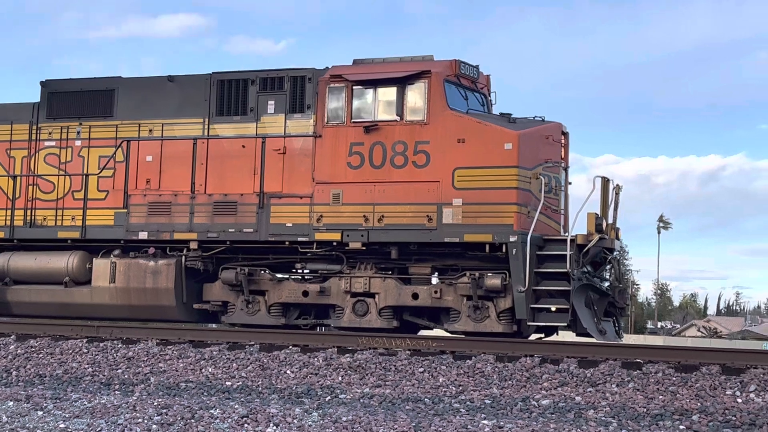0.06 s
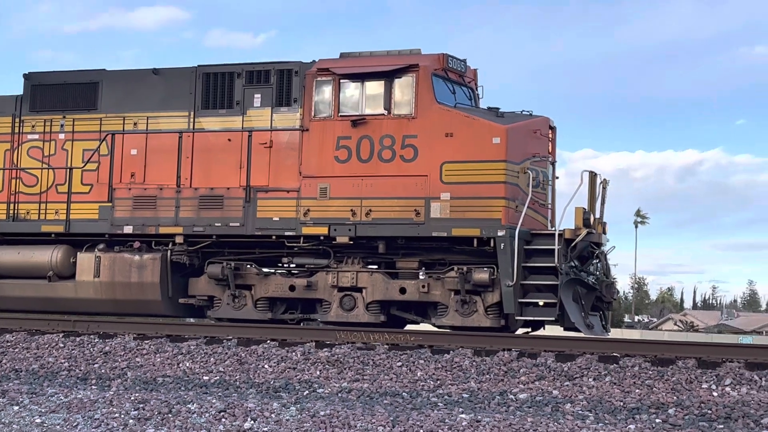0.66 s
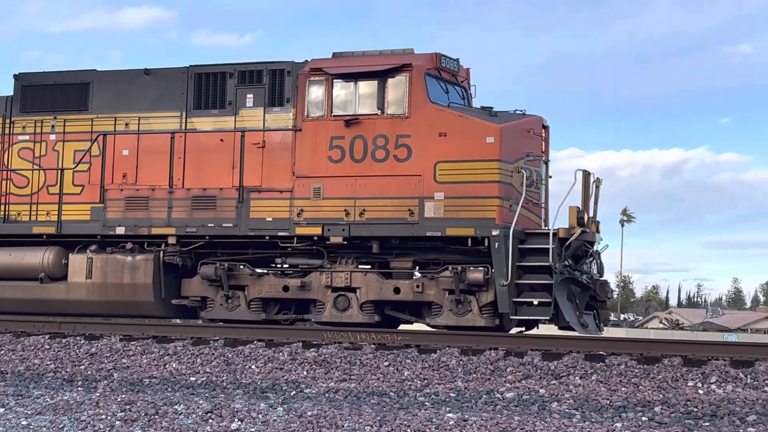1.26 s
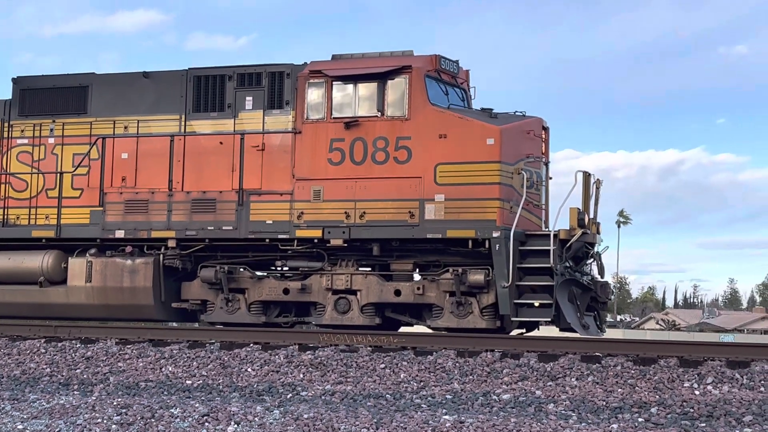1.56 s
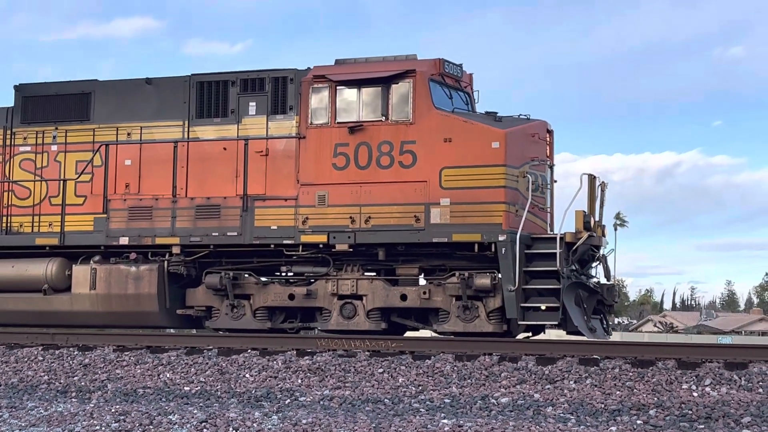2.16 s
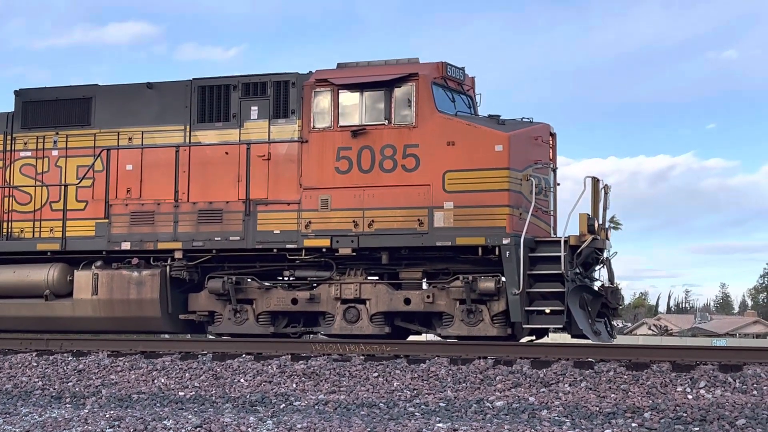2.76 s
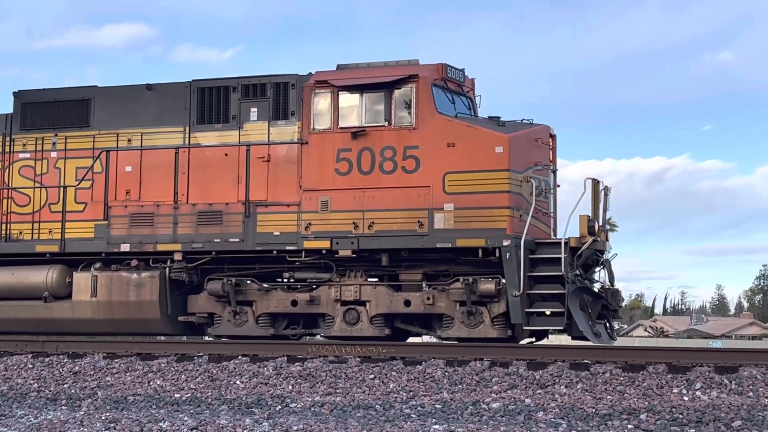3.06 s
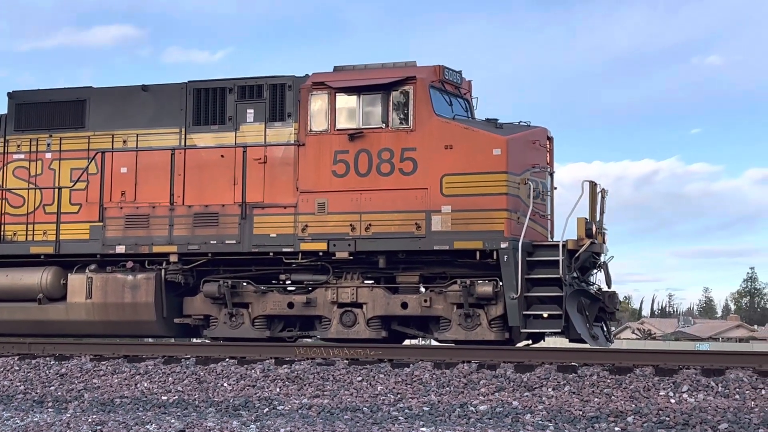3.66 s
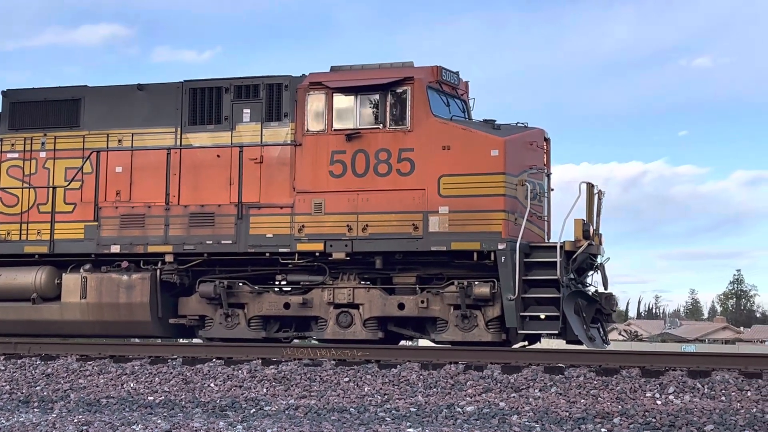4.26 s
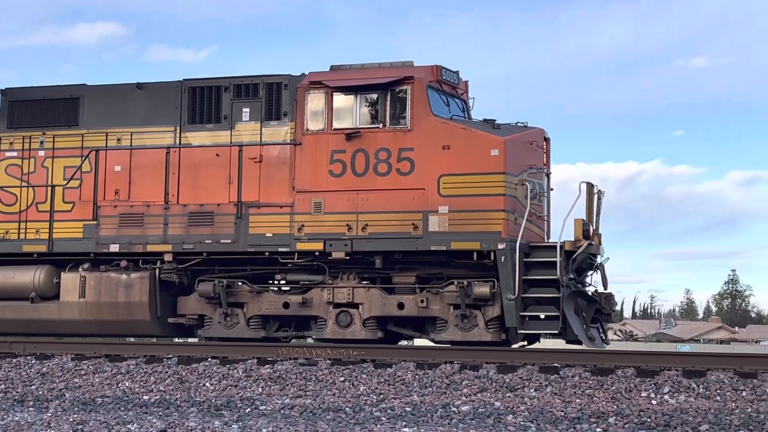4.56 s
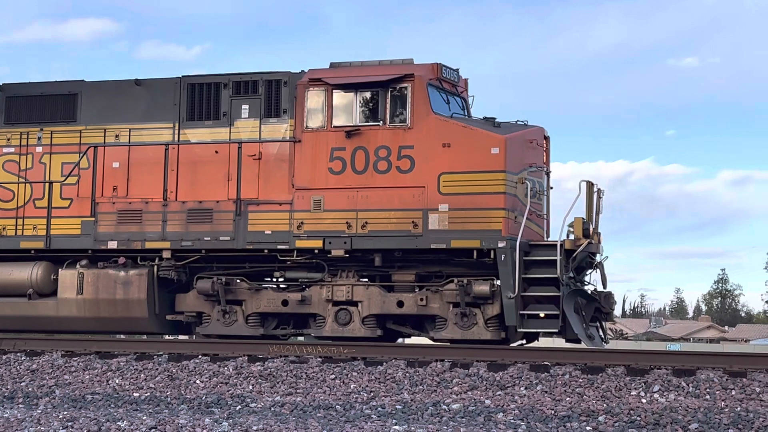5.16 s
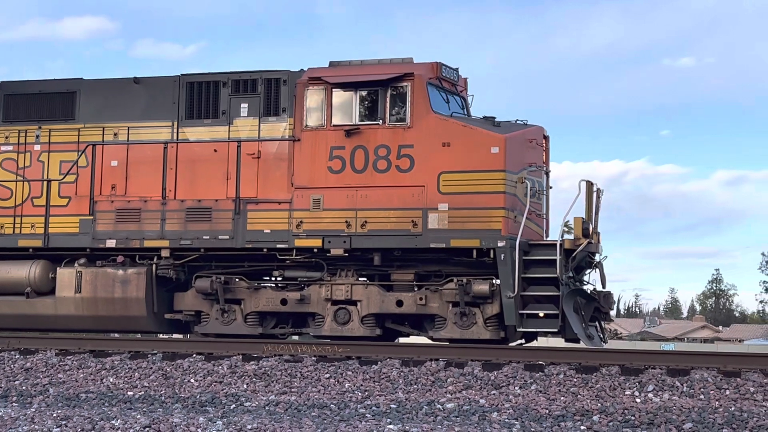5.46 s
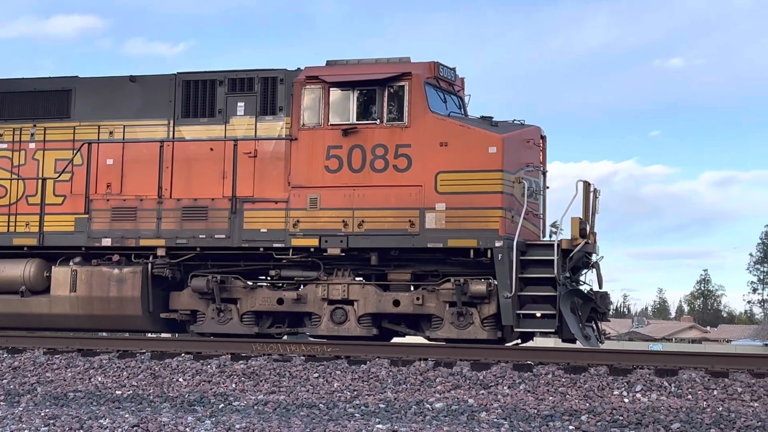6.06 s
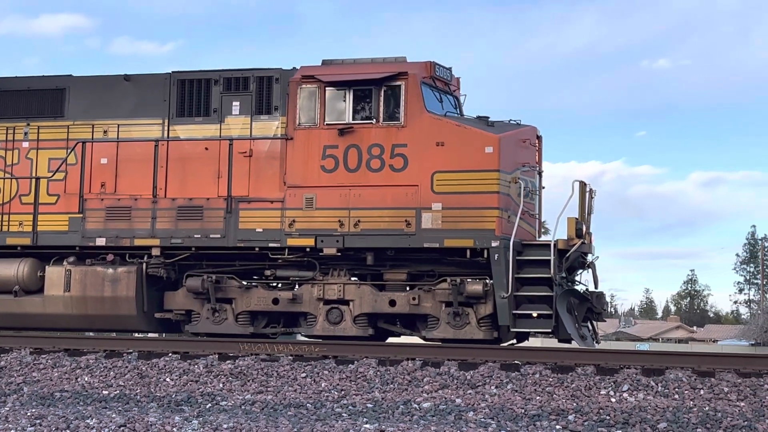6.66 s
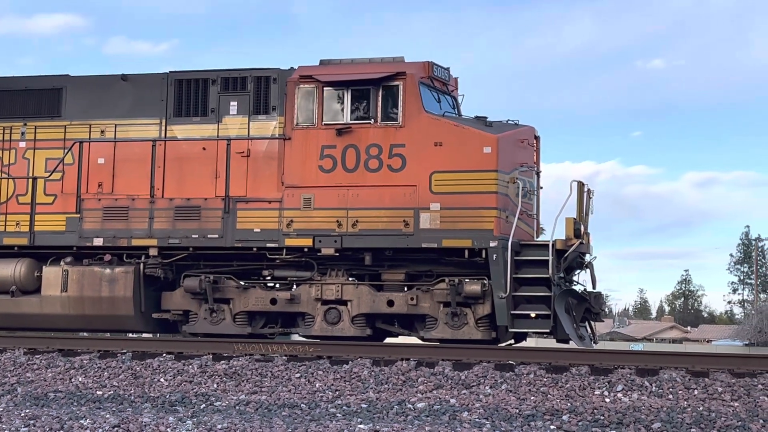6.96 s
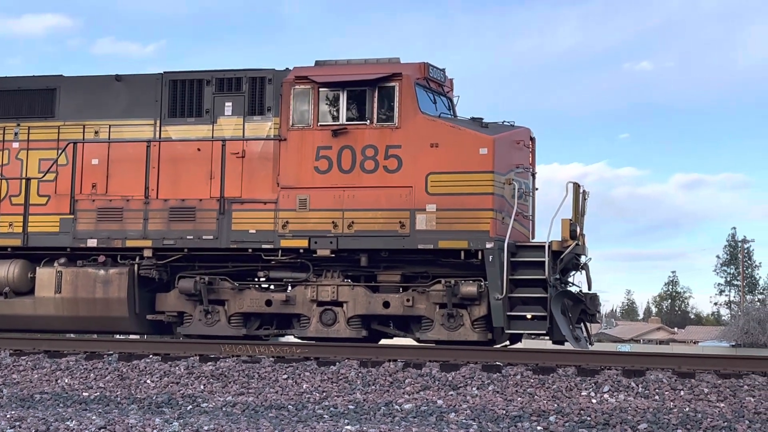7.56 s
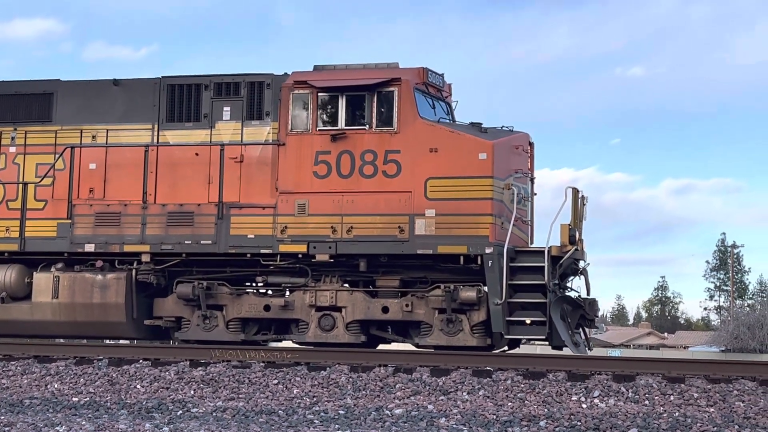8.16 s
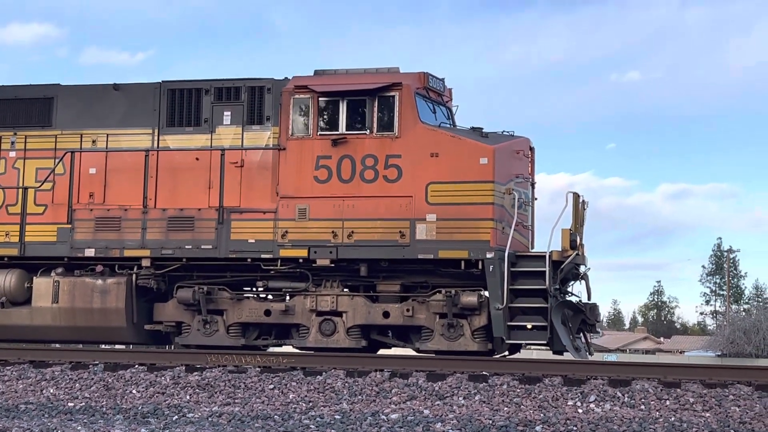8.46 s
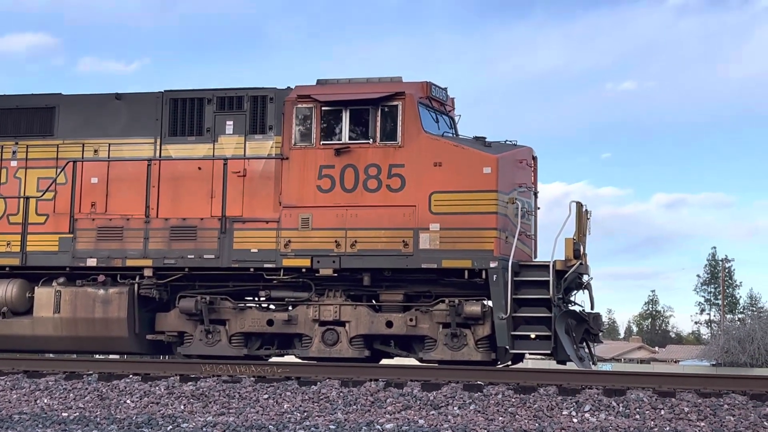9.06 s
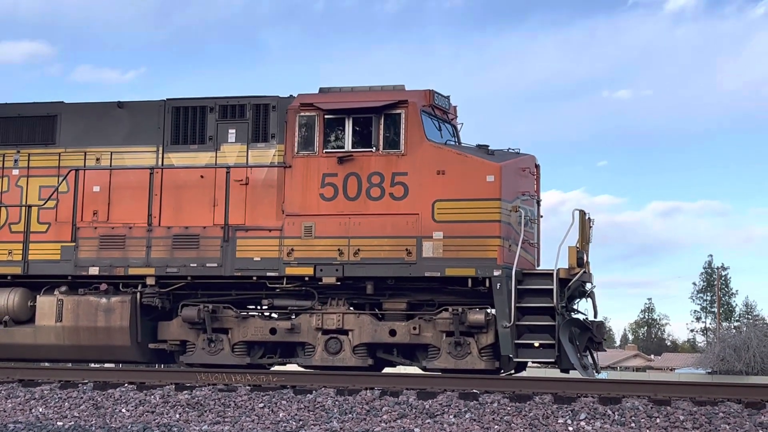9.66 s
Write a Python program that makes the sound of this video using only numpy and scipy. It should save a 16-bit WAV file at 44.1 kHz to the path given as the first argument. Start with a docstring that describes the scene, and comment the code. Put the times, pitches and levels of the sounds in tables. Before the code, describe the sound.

Deep, pulsing diesel locomotive rumble and machinery drone pass slowly, with a surging turbo whistle, regular short air spits and light wind buffeting.

```python
"""A diesel locomotive creeps past a few metres away. From the start its exhaust throbs four times a cycle,
the turbocharger's breathy whistle surges in step, and a compressor and fans drone over the engine room's
roar. An air drain valve spits about twice a second throughout. From 2 to 8 s thin whines crest in turn
as their housings go by, and at 7 s the valve lets out its longest spit. Light gusts buffet the two
closely spaced microphone ports along the way, hardest near the end."""
import sys
import numpy as np
from scipy import signal
from scipy.fft import rfft, irfft
from scipy.io import wavfile
from scipy.ndimage import uniform_filter1d

SR = 44100
rng = np.random.default_rng(int(sys.argv[2]) if len(sys.argv) > 2 else 0)


def put_to_file(sound):
    """Save the sound as 16-bit audio at rate SR, in the file named by the first command-line argument."""
    columns = np.atleast_2d(sound).T  # one column per channel
    safe = np.clip(columns, -1, 1)
    whole_steps = np.round(safe * 32767)
    wavfile.write(sys.argv[1], SR, whole_steps.astype(np.int16))


N = 437031
T, HZ = np.arange(N) / SR, np.fft.rfftfreq(N, 1 / SR)

# The engine's bass notes: (multiple of the cycle rate, level [dB])
ENGINE_TONES = [(13, -32.5), (15, -25), (17, -32), (19, -33), (34, -34.5), (44, -38)]
# Rumble EQ: (frequency [Hz], gain [dB])
RUMBLE_EQ = [(10, -40), (22, -37), (31, -22.5), (41, -9.5), (51, 0), (68, 1), (85, -4.5), (105, -6.5),
             (150, -13.5), (200, -22), (270, -41.5), (600, -84)]
# Rumble fader: (time [s], level [dB])
RUMBLE_FADER = [(0.0, -17.5), (0.5, -18.0), (0.7, -14.5), (1.9, -17.0), (2.5, -14.5), (2.7, -18),
                (3.7, -13.5), (3.9, -17), (5.4, -14), (5.7, -19), (6.1, -15), (7.2, -16.5), (7.5, -14.5),
                (9.1, -15), (9.3, -16), (9.9, -14)]
# The four-throb groove: (position [cycles], accent [dB], half-width [cycles])
THROB_PATTERN = [(0.04, 2.5, 0.051), (0.28, 4.5, 0.094), (0.49, 5.5, 0.085), (0.77, 6, 0.08)]

def exhaust(cycles):
    """Uneven firing makes the rumble throb; the engine's tones crest together on the strongest throb."""
    from_accent = cycles - 0.77
    tones = sum(amp(db) * tone(order * from_accent, waver=0.14) for order, db in ENGINE_TONES)
    rumble = steadied(noise(amp(over_hz(RUMBLE_EQ))), span_s=0.11)
    throb = unit(amp(each_cycle(THROB_PATTERN, cycles) + 0.88 * drift(12)))
    return tones + amp(over_time(RUMBLE_FADER)) * throb * rumble


# Whistle resonances: (centre [Hz], width [Hz], gain [dB])
WHISTLE_PEAKS = [(1907, 78, 1), (1804, 64, -3.5)]
# Whistle fader: (time [s], level [dB])
WHISTLE_FADER = [(0.0, -43), (0.4, -38.5), (1.8, -44.5), (2.4, -38), (2.8, -40), (4.7, -39), (5.1, -36.5),
                 (5.8, -41), (6.0, -38), (6.8, -40.5), (7.0, -39), (9.9, -38.5)]
# One surge and one sag a cycle: (position [cycles], gain [dB], half-width [cycles])
SURGE_PATTERN = [(0.51, 2.5, 0.048), (0.85, -3.5, 0.11)]

def turbocharger(cycles):
    """A breathy whistle, to the right, that surges with every engine cycle and bends up as it swells."""
    bend_hz_per_db, warble_hz = 13, 18
    surge_db = each_cycle(SURGE_PATTERN, cycles) + 1.77 * drift(7)
    colour = sum(amp(db) * bell(hz, width) for hz, width, db in WHISTLE_PEAKS)
    breath = steadied(noise(colour, left_db=-7.5), span_s=0.12)
    bend_hz = bend_hz_per_db * (surge_db - surge_db.mean()) + warble_hz * drift(6)
    whistle = (signal.hilbert(breath) * np.exp(2j * np.pi * np.cumsum(bend_hz) / SR)).real
    return amp(over_time(WHISTLE_FADER) + surge_db) * whistle


# The compressor's drone: (multiple of the beat rate, level [dB])
COMPRESSOR_TONES = [(4, -35.5), (5, -28.5), (6, -28.5), (8, -27), (9, -31), (10, -42.5), (11, -30.5),
                    (12, -35), (13, -24), (14, -37), (15, -39.5), (20, -48.5), (21, -46), (24, -52.5),
                    (25, -42.5), (29, -49), (30, -43.5), (31, -60.5), (32, -56), (37, -55)]

def compressor(beats):
    """The pistons' beat sounds as a stack of tones, topped by a faint buzz of higher harmonics."""
    drone = sum(amp(db) * tone(order * beats + rng.random(), waver=0.075)
                for order, db in COMPRESSOR_TONES)
    buzz = sum(amp(-54.5 - .2 * k) * np.cos(2 * np.pi * ((k + 34) * beats + rng.random()))
               for k in range(36))
    return (drone + buzz) * amp([[.5], [-.5]])  # a touch to the left


# Air jet EQ: (frequency [Hz], gain [dB])
JET_EQ = [(300, -30), (900, -11.5), (1500, -6), (2400, -3), (4200, -0.5), (5400, -2), (6500, -3.5),
          (7700, -4.5), (9000, -2.5), (10500, -9), (11600, -7), (13500, -9), (15800, -2.5)]
# Nozzle resonances: (centre [Hz], width [Hz], boost [dB])
NOZZLE_PEAKS = [(2670, 87, 3), (2940, 32, 3), (3490, 50, 5), (3750, 33, 4), (3930, 34, 1.7),
                (4060, 25, 3.4), (4270, 80, 3.4), (4630, 43, 3.3), (5500, 17, 1.7), (11700, 130, 3.5)]
# Spit cues: (time [s], relative level [dB], time open [s], ring pitch [Hz])
SPIT_CUES = [(0.131, -10.5, 0.0085, 3330), (0.594, -12, 0.012, 4350), (1.1597, -9.5, .0063, 4720),
             (1.7437, -12.5, .0085, 4390), (2.257, -9.5, .0092, 4720), (2.764, -14, 0.012, 3260),
             (3.3, -12.5, 0.012, 2810), (3.7686, -11.5, .016, 3500), (4.1999, -11, 0.0085, 4850),
             (4.7321, -11.5, 0.034, 2650), (5.204, -13.5, 0.013, 4010), (5.7606, -10, 0.01, 3900),
             (5.9585, -8.5, .0043, 3940), (6.4764, -11.5, 0.0081, 4320), (7.0036, -8.5, 0.071, 3500),
             (7.3802, -8.5, .018, 3730), (7.7655, -10.5, 0.024, 2780), (8.374, -9.5, 0.0059, 4200),
             (9.1403, -12, .019, 4290), (9.672, -9.5, 0.017, 3480)]

def drain_valve():
    """The valve snaps open, air jets through the ringing nozzle, and dies between frame and ballast."""
    jet_rise_s, jet_t60_s, echo_rise_s, echo_t60_s = 0.0052, .12, 0.044, 0.46
    treble_db, dulling_db_per_s = 0.4, 35  # the longer the valve stays open, the duller its spit
    colour = amp(over_hz(JET_EQ) + sum(db * bell(hz, width) for hz, width, db in NOZZLE_PEAKS))
    jet = noise(colour, mono=True)
    echo = noise(colour * amp(-HZ / 4000), mono=True)
    treble = irfft(rfft(jet) * np.clip((HZ - 5000) / 4000, 0, 1), N)
    flutter, out = drift(40), np.zeros((2, N))
    for s, db, open_s, ring_hz in SPIT_CUES:
        part = slice(int((s - .002) * SR), int((s + .5) * SR))
        t = T[part] - T[part][0]
        shut_s = np.maximum(t - open_s, 0)
        jet_env = np.minimum(t / jet_rise_s, 1) * amp(-60 * shut_s / jet_t60_s)
        echo_env = np.minimum(t / echo_rise_s, 1) * amp(-60 * shut_s / echo_t60_s)
        air = jet[:, part] + (amp(treble_db - dulling_db_per_s * open_s) - 1) * treble[:, part]
        frame_bounce = 0.44 * np.roll(air, int(rng.uniform(0.0017, .005) * SR), axis=1)
        ring = amp(-10.5) * np.cos(2 * np.pi * ring_hz * t + flutter[part])
        direct = jet_env * (air + frame_bounce + ring)
        tail = amp(-23) * echo_env * echo[:, part]
        out[:, part] += amp(db) * (direct + tail)
    return out * amp(-7 + 1.2 * drift(250))  # water in the jet makes it sputter


# Buffeting EQ: (frequency [Hz], gain [dB])
BUFFET_EQ = [(20, -40), (60, -4), (110, 1), (170, -4), (240, -8), (330, -13), (480, -23), (800, -45),
             (2000, -80.5)]
# Gust cues: (time [s], level [dB], half-length [s])
GUST_CUES = [(0.048, -19.5, 0.032), (1.13, -23, .07), (2.19, -29, 0.046), (3.583, -20, 0.3),
             (4.277, -23, 0.19), (4.603, -23.5, 0.035), (5.324, -20.5, 0.18), (6.21, -29, .05),
             (6.615, -22, 0.047), (7.106, -23, 0.2), (7.377, -12, 0.031), (7.62, -20, 0.19),
             (8.072, -18, 0.05), (8.213, -17.5, 0.038), (8.422, -25, 0.047), (9.29, -11.5, 0.085),
             (9.58, -16.5, 0.075)]
# Thump cues: (time [s], level [dB], pitch [Hz])
THUMP_CUES = [(1.132, -12, 240), (2.18, -21, 200), (5.326, -10, 330), (5.355, -6, 168), (9.271, -11, 149),
              (9.31, -15, 400), (9.565, -9.5, 400)]

def wind():
    """Gusts buffet the microphone in lumpy swells over a light breeze; single eddies thump."""
    breeze = amp(-34 + 3 * drift(3))
    gust_power = sum((amp(db) * swell(T - s, half_s)) ** 2 for s, db, half_s in GUST_CUES)
    buffet = steadied(noise(amp(over_hz(BUFFET_EQ))), span_s=.1) * amp(1.8 * drift(55))
    out = buffet * np.sqrt(breeze ** 2 + gust_power)
    for s, db, hz in THUMP_CUES:
        turns = (T - s) * hz
        out += amp(db) * swell(turns, 0.95) * np.sin(2 * np.pi * turns)
    return out


# EQs of the roar and the hiss: (frequency [Hz], gain [dB])
ROAR_EQ = [(25, -16.5), (200, -0.5), (300, -2.5), (450, 1), (530, -1.5), (680, -6.5), (930, -4.5),
           (1200, -9), (1600, -10), (2250, -15), (2750, -17), (3600, -24), (5300, -27.5), (7500, -38),
           (15000, -66.5)]
HISS_EQ = [(500, -31.5), (2500, 7.5), (4000, -4.5), (6000, -0.5), (8000, -8.5), (11500, -12.5),
           (13000, -24.5), (16000, -31.5)]
# Roar panning: (frequency [Hz], left minus right [dB])
ROAR_PAN = [(100, 15.5), (200, 3.5), (700, 0.5), (1080, 3.5), (1450, -4), (1900, -11), (2400, -3),
            (3200, 0), (4400, 0.5)]
# The roar arrives from the left: (frequency [Hz], left lead [rad])
ROAR_LEAD = [(100, 0.52), (300, 0.57), (640, 0.4), (1000, 0.85), (1300, 1.22), (1550, 2.12), (2000, 0.5),
             (2600, 0.69), (3200, 0.38), (5000, 0)]

def engine_room(beats):
    """Roar and hiss, coloured by steel panels and louvres; the hiss chuffs on every compressor beat."""
    beat = np.cos(2 * np.pi * beats)
    strokes = np.cos(2 * np.pi * beats * 4)
    knots_hz = np.geomspace(300, 9000, 300)
    panels = amp(1.6 * np.interp(HZ, knots_hz, rng.standard_normal(len(knots_hz)), left=0, right=0))
    roar = noise(panels * amp(over_hz(ROAR_EQ)), left_db=over_hz(ROAR_PAN), lead_rad=over_hz(ROAR_LEAD))
    roar *= 1 + 0.033 * beat + 0.036 * strokes
    hiss = noise(panels * amp(over_hz(HISS_EQ))) * amp(.7 * drift(11))
    hiss *= 1 + .27 * beat + 0.091 * strokes
    return amp(-28.5) * roar + amp(-54) * hiss


# Hum bed of fans, pumps and gears on their own shafts: (pitch [Hz], level [dB])
HUM_BED = [(529.2, -54.5), (587.5, -51.5), (747.9, -61.5), (777.4, -56), (836.4, -60), (893.5, -55.5),
           (1085, -60.5)]
# Whines of fans and electric gear: (pitch [Hz], level [dB], crest time [s], half-length [s])
WHINE_CUES = [(465.6, -40, 7.5, 4), (2365, -59, 5, 6), (2675, -61, 4, 5), (4592, -62, 4.5, 3.5),
              (4786, -60, 2, 2.5), (5285, -65, 6, 5), (5850, -66, 8, 3), (7101, -63, 2.3, 2.6)]

def fans_and_gears():
    """Steady hums, and thin whines that swell as each housing goes by; the higher ones flutter more."""
    out = sum(amp(db) * tone(hz * T + rng.random(), waver=0.1) for hz, db in HUM_BED)
    shaft_s = T + .00009 * drift(9)  # the whines share one slight pitch wobble
    for hz, db, s, half_s in WHINE_CUES:
        flutter = unit(amp(3 * np.sqrt(hz / 7000) * drift(6)))
        out += amp(db) * swell(T - s, half_s) * flutter * tone(hz * shaft_s + rng.random(), waver=0.12)
    return out


# Stereo image of the noise layers: (frequency [Hz], left-right likeness [0-1])
STEREO_LIKENESS = [(60, 1), (130, 0.76), (300, 0.8), (450, 1), (800, 0.86), (1150, 0.7), (1450, 0.83),
                   (1650, 1), (1900, 0.99), (2400, 0.8), (3200, 1), (15000, 1)]

def noise(colour, left_db=0, lead_rad=0, mono=False):
    """Coloured two-channel noise of rms 1; the left may differ in level and lead in phase."""
    mid, side = rfft(rng.standard_normal((2, N)))
    likeness = 1 if mono else over_hz(STEREO_LIKENESS)
    mid, side = mid * np.sqrt(1 + likeness), side * np.sqrt(1 - likeness)
    lean = amp(left_db / 2) * np.exp(.5j * lead_rad)
    return unit(irfft(np.array([(mid + side) * lean, (mid - side) / lean]) * colour, N))


def steadied(x, span_s):
    """A leveller that takes the slow swells out of a noise."""
    power = uniform_filter1d((x ** 2).mean(0), int(span_s * SR))
    return x / np.sqrt(uniform_filter1d(power, int(span_s * SR / 2)) + 1e-9)


def tone(turns, waver):
    """A sine of rms about 1 whose strength and phase waver a few times a second."""
    knots = np.linspace(0, T[-1], num=40)
    strength, slip = (np.interp(T, knots, row) for row in rng.standard_normal((2, len(knots))))
    return np.sqrt(2) * (1 + waver * strength) * np.cos(2 * np.pi * turns + waver * slip)


def drift(per_s):
    """A smooth random modulator of rms 1 that wanders at roughly the given rate."""
    walk = np.convolve(rng.standard_normal(2 ** 16), signal.windows.gaussian(15, 2.25), "same")
    return unit(np.interp(10 * per_s * T, np.arange(len(walk)), walk))


def each_cycle(pattern, cycles):
    """A level in dB that loops the same rounded swells in every cycle."""
    return sum(db * swell((cycles - place + .5) % 1 - .5, width) for place, db, width in pattern)


def swell(offset, half_width):
    """A rounded rise and fall, cresting at offset 0."""
    return np.exp(-(offset / half_width) ** 2)


def bell(centre_hz, width_hz):
    """The bell curve of one resonance."""
    return 1 / (1 + (2 * (HZ - centre_hz) / width_hz) ** 2)


def over_hz(points):
    """Joins (frequency [Hz], value) points on a log-frequency axis."""
    hz, value = np.transpose(points)
    return np.interp(np.log(HZ + 1), np.log(hz + 1), value)


def over_time(points):
    """Joins (time [s], value) points."""
    return np.interp(T, *np.transpose(points))


def amp(db):
    """Decibels to gain."""
    return 10 ** (np.asarray(db) / 20)


def unit(x):
    """Scales to rms 1."""
    return x / np.sqrt(np.mean(x ** 2) + 1e-20)


def scene():
    """The mix: the engine holds its tempo; the compressor keeps its own, which wanders very slightly."""
    cycle_hz, beat_hz = 3.6685, 14.183
    cycles = cycle_hz * T
    beats = beat_hz * T + 0.0044 * drift(0.643)
    machines = exhaust(cycles) + turbocharger(cycles) + compressor(beats) + fans_and_gears()
    return machines + engine_room(beats) + wind() + drain_valve()


# Phase between the microphone ports: (frequency [Hz], left lead [rad])
PORT_LEAD = [(20, 0), (5000, 0), (6900, -1.2), (7500, -1.9), (7850, -2.95), (8500, -np.pi), (9300, -3.6),
             (10000, -4.7), (11000, -6.1), (13100, -6.5), (14200, -8.8), (14800, -9.35),
             (15800, -3 * np.pi)]

def record(dry):
    """The two ports part in phase towards the treble; a soft clip rounds the peaks; a low-pass follows."""
    ceiling, cutoff_hz = .97, 15800
    turn = np.exp(.5j * over_hz(PORT_LEAD))
    ports = irfft(rfft(dry) * np.array([turn, turn.conj()]), N)
    rounded = ports / (1 + (ports / ceiling) ** 12) ** (1 / 12)
    low_pass = signal.firwin(511, cutoff_hz, window=("kaiser", 9), fs=SR)
    return signal.oaconvolve(rounded, low_pass[None], "same")


dry = scene()
out = record(dry)
put_to_file(out)
```